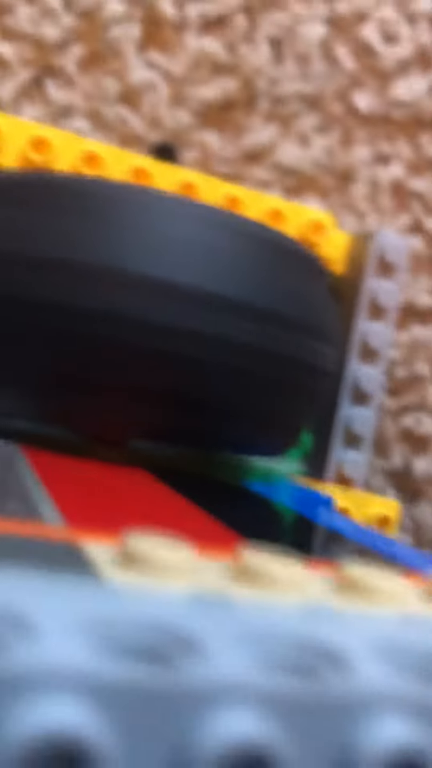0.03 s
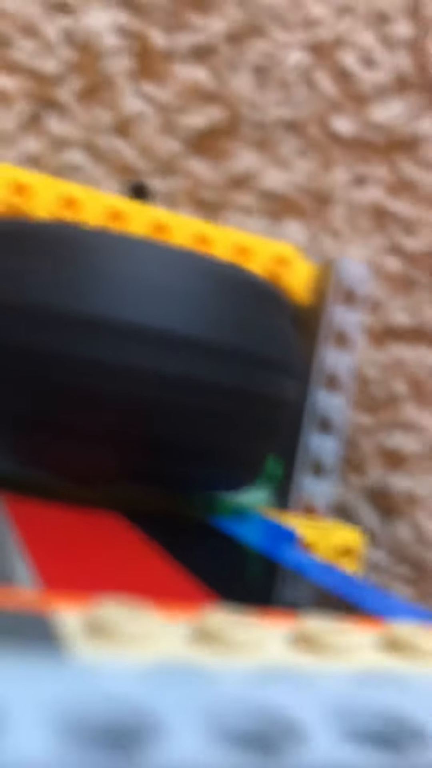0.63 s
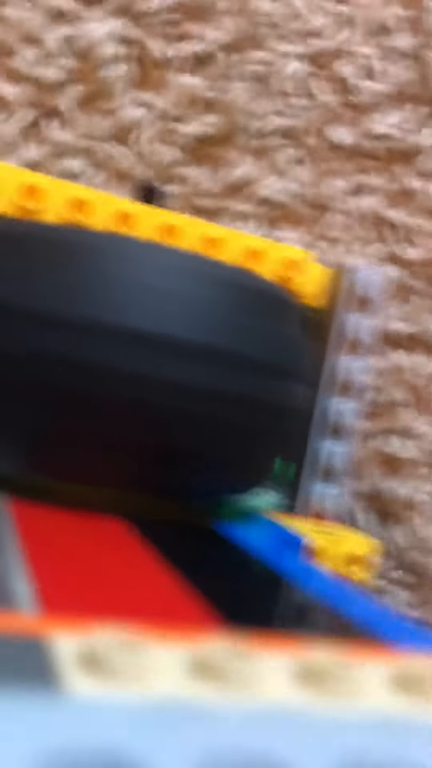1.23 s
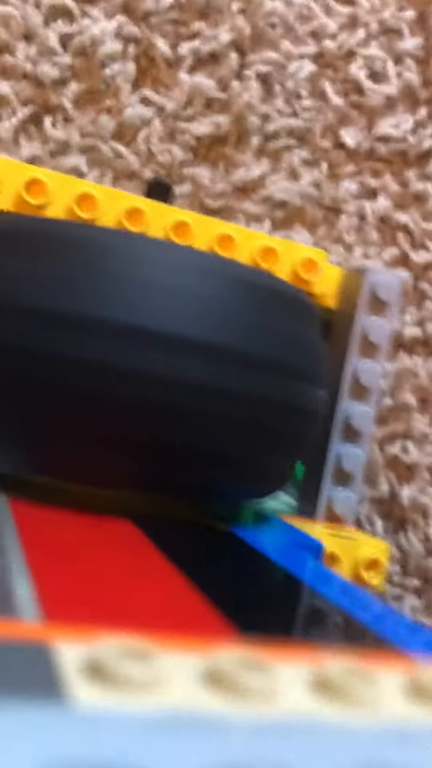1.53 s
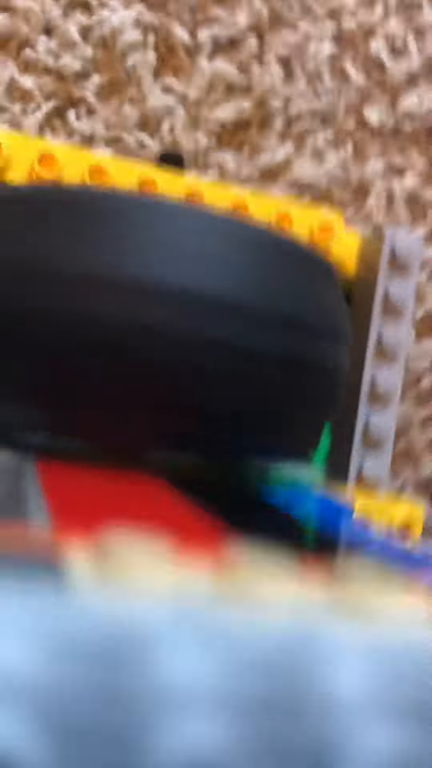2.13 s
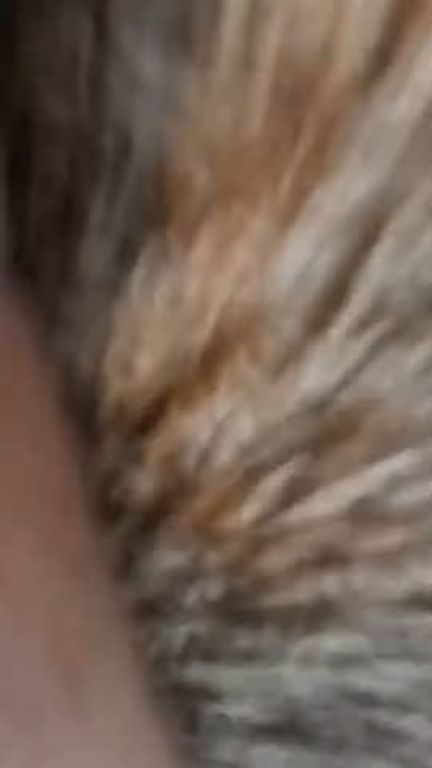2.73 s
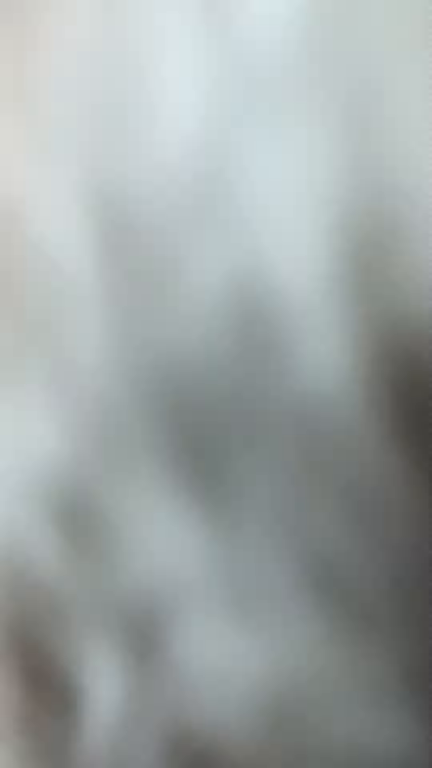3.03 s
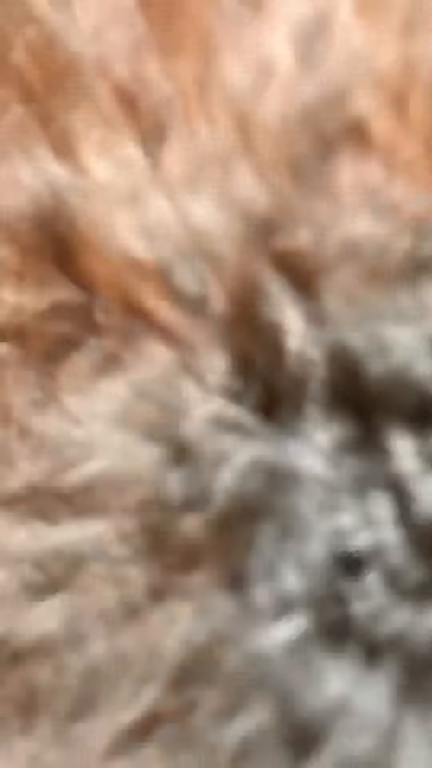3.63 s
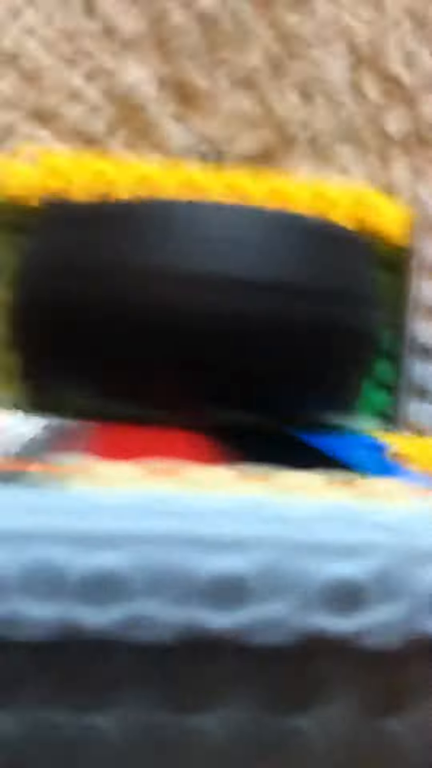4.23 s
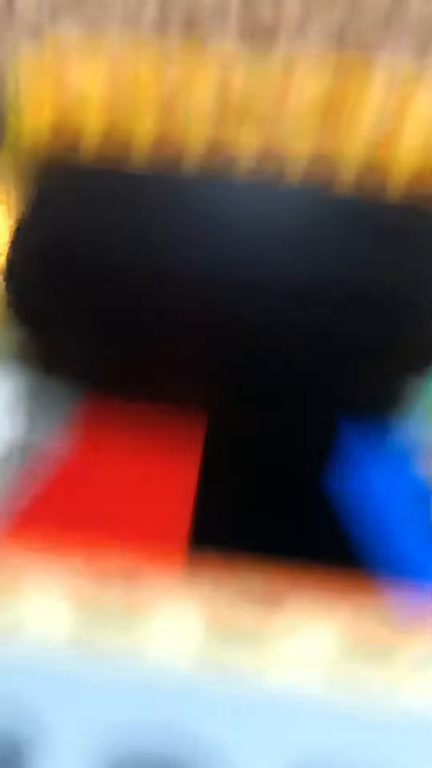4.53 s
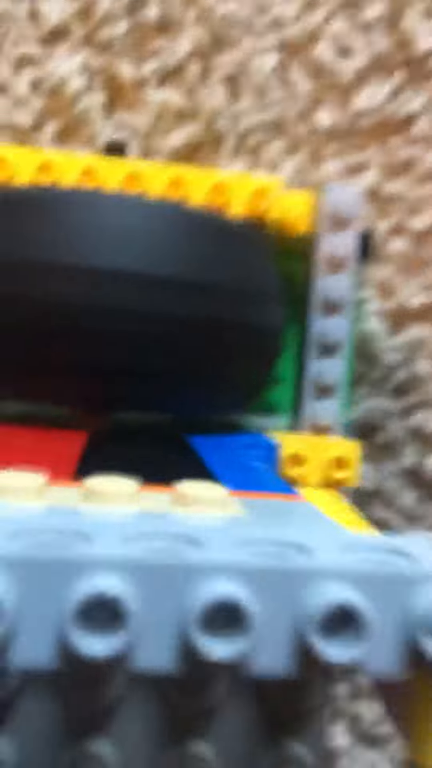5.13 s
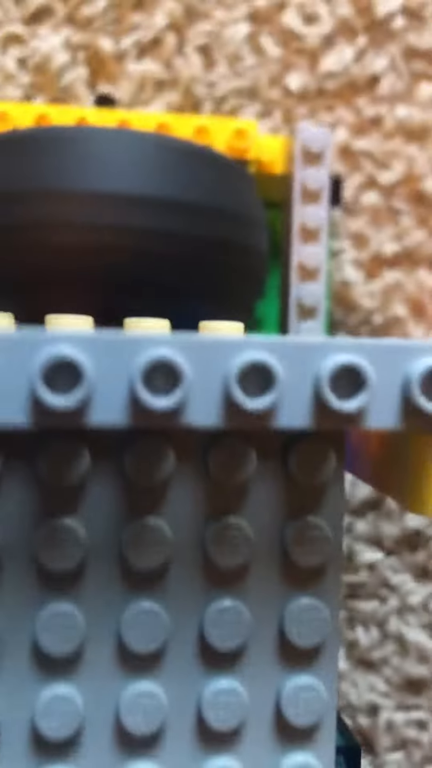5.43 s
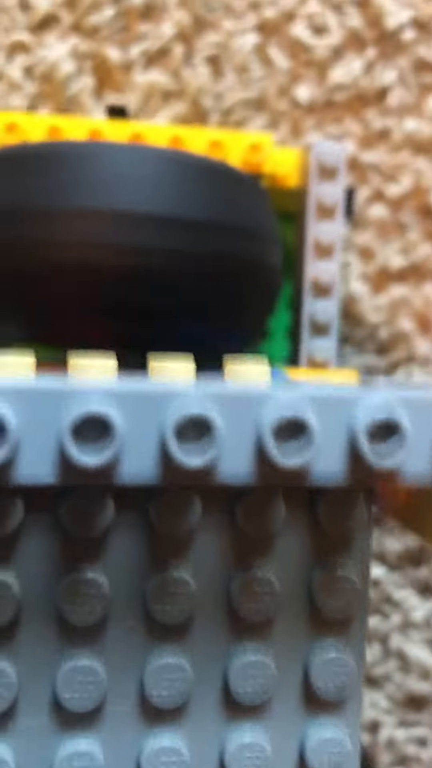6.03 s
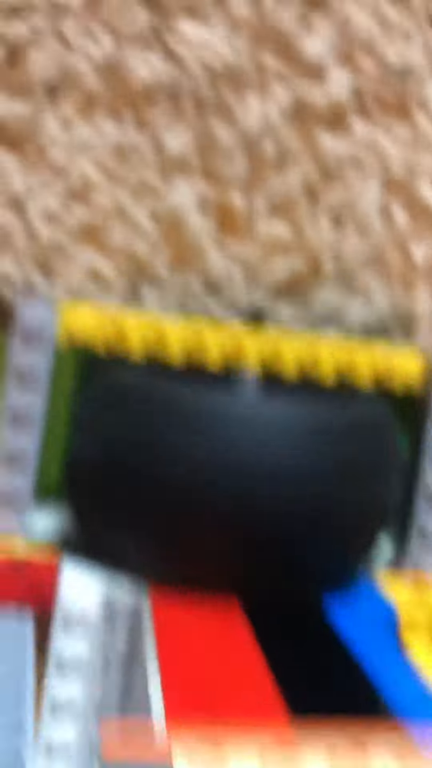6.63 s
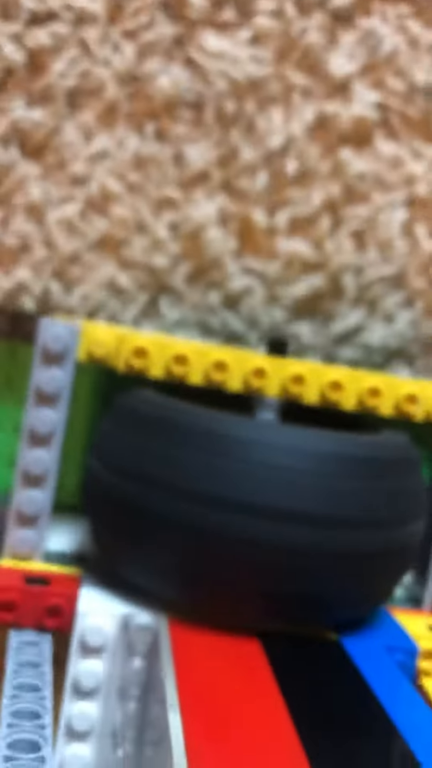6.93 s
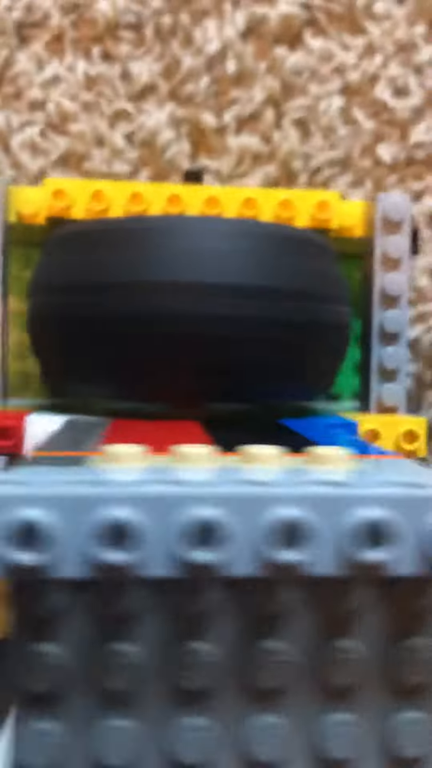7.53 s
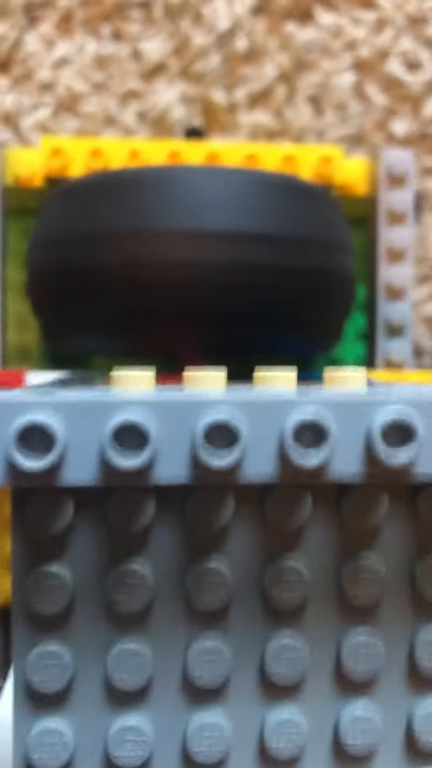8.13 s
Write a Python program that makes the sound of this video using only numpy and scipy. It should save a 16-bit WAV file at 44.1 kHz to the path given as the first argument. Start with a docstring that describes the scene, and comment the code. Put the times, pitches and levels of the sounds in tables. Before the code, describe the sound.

A small toy-brick piston engine runs on vacuum cleaner suction, making a rapid plastic rattle with pulsing hiss. It starts revved up, then drops to a fast idle. Around three seconds in, the close microphone brushes and bumps the carpet. The engine revs again a little past halfway, settles, and starts a third rev at the end. The vacuum cleaner hums faintly behind it indoors.

```python
"""A toy-brick piston engine on a carpet, run on vacuum cleaner suction and revved three times.
Twice a turn air rushes through its valve and the piston rattles and knocks in the plastic frame.
The microphone is close and wanders round the toy, now aimed at it, now turned away. About three
seconds in it brushes and bumps the carpet. The vacuum cleaner hums faintly in the background."""
import sys
import numpy as np
from scipy import signal
from scipy.io import wavfile
from scipy.ndimage import uniform_filter1d, minimum_filter1d

SR = 44100
rng = np.random.default_rng(int(sys.argv[2]) if len(sys.argv) > 2 else 0)


def unload_wav(signal):
    """Save mono or channel-first audio to the path in sys.argv[1] as 16-bit WAV at rate SR, clipped to [-1, 1]."""
    wavfile.write(
        sys.argv[1],
        SR,
        np.round(np.clip(np.atleast_2d(signal).T, -1, 1) * 32767).astype(np.int16),
    )


N = 365588

# The revs. Each row: throttle opens and shuts in seconds, speed to gain in turns per second.
REVS = [(-.445, 1.205, 16.057), (4.873, 5.651, 13.417), (7.883, 9, 14.447)]
# The flywheel at idle. Each row: time in seconds, speed in turns per second.
IDLE_SPEED = [(0, 25.123), (2.3, 26.173), (3.4, 24.613), (4.3, 23.645), (6.6, 24.711), (7.2, 25.593),
              (7.7, 24.533)]
# The two strokes of a turn. Each row: place in turns, spread in turns, relative level in dB.
STROKES = [(0.317, 0.052, -3.5), (0.689, 0.034, -5)]
# The piston's end blows. Each row: place in turns, relative dB with throttle shut, then fully open.
PISTON_BLOWS = [(0.222, 3, 1), (.63, 1.5, -9)]
# The frame shaking. Each row: multiple of the speed, relative dB at light load, then at full load.
THRUM_PARTIALS = [(1, -74, -56), (2, -58, -42), (3, -43, -43), (4, -57, -43), (5, -44, -37), (6, -54, -37),
                  (7, -52, -39), (8, -49, -45), (9, -56, -47), (10, -49, -50), (11, -51, -53)]
# Rings of the frame and the small bricks. Each row: pitch in Hz, bandwidth in Hz, relative level in dB.
FRAME_MODES = [(568, 110, -5), (628, 45, 2.5), (668, 24, 6), (912, 32, 3), (1020, 47, 2), (1430, 800, -7),
               (1960, 210, -8.5)]
BRICK_MODES = [(3630, 560, -14), (4630, 270, 2.5), (4960, 340, 14), (7100, 380, -7)]
# The vacuum cleaner's motor tones. Each row: pitch in Hz, relative level in dB.
MOTOR_TONES = [(185, -48.5), (740, -49)]
# The tone colour of each noise. Each row: frequency in Hz, relative level in dB.
VALVE_SPECTRUM = [(2000, -35), (4500, -19), (6400, -13), (7100, -8.5), (7600, -2.5), (7900, -2),
                  (8300, -4.5), (8900, -12.5), (10500, -22), (16000, -27)]
FIZZ_SPECTRUM = [(5000, -24), (8500, 2.5), (9900, 11.5), (10800, 4.5), (12000, -1), (14000, -3),
                 (16000, -18)]
RATTLE_SPECTRUM = [(900, -36), (2500, -12.5), (3300, -2.5), (3800, -2), (4500, 0.5), (5500, 1), (6600, -8),
                   (7800, -3), (9000, -0.5), (11000, -47), (16000, -29.5)]
SCRAPE_SPECTRUM = [(30, -44), (100, -21), (200, -1.5), (300, -6), (420, -4.5), (560, -3), (740, 2.5),
                   (880, 1), (1030, 2), (1350, -1.5), (1850, 3.5), (2500, -4), (4000, -5), (9000, -67)]
AIRFLOW_SPECTRUM = [(30, -30), (80, -22), (120, -15.5), (160, -6.5), (195, -6), (235, -7), (300, -14),
                    (450, -25), (2000, -28)]
PILE_SPECTRUM = [(30, -49), (90, -9), (170, 4), (300, -5.5), (550, 1.5), (1200, -3), (1700, 4),
                 (2100, -13.5), (3500, -38), (12000, -55)]
# Microphone aim. Each row: time in seconds, 0 for on the engine to 1 for turned away.
MIC_AIM = [(0, .25), (2.28, 0.34), (2.48, 1), (3.9, 0.97), (4.2, 0), (5.6, 0.03), (6.3, 0.26), (7.05, 0.89),
           (7.35, 0.26), (7.9, 0.07)]
# Nearness, bass and treble fizz on the way round the toy. Each row: time in seconds, gain in dB.
MIC_NEARNESS = [(0.0, -21), (0.04, -21.5), (1.25, -23), (1.29, -24.5), (2.22, -24), (2.88, -34),
                (3.14, -27), (3.44, -28), (3.58, -31), (3.62, -27), (4.27, -19), (4.39, -21.5),
                (4.85, -18.5), (5.03, -22), (6.3, -20.5), (6.72, -25), (7.13, -21.5), (8.29, -22)]
MIC_BASS = [(0, -12), (1.9, -4), (2.3, 0.5), (5.1, -1), (5.6, 5), (8.29, 7.5)]
MIC_TREBLE = [(0, 2), (1.9, -2), (2.5, 3), (3.5, 2), (3.78, 7.5), (4.45, -0.5), (6, 1), (7.1, -3),
              (8.29, 2)]
# The microphone crosses the valve's narrow beam of hiss, sweeps through the pile, is pressed into it.
# Each row: centre in seconds, half length in seconds, gain at the centre in dB.
BEAM_PASSES = [(2.17, 0.1, 3), (3.3, 0.67, 1), (4.48, 0.19, 6), (7.1, 0.24, 0)]
PILE_SWEEPS = [(3.05, 0.21, -19.5), (3.42, 0.13, -20.5), (3.76, .3, -27)]
PILE_PRESSES = [(2.79, 0.042, -4), (3.0, .05, 0.5), (3.55, 0.039, -1.5)]
# Bumps on the microphone. Each row: start in seconds, level in dB, first pitch in Hz, decay in seconds.
MIC_BUMPS = [(2.783, -11, 1090, 0.0037), (2.802, -7.5, 135, .008), (2.848, -10, 700, 0.0065),
             (2.953, -6, 1026, 0.014), (2.970, -7, 470, .019), (2.985, 4, 220, 0.01),
             (2.999, -3, 725, 0.031), (3.013, 9, 1134, 0.0094), (3.092, -0.5, 1285, 0.0067),
             (3.329, -26, 130, .014), (3.369, -17, 170, .009), (3.424, -23, 900, 0.0028),
             (3.628, -25, 120, .016)]


def amp(db):
    """Decibels to gain."""
    return 10 ** (np.asarray(db) / 20)


def unit(x):
    """Scales to an rms of one."""
    return x / np.sqrt(np.mean(x ** 2) + 1e-20)


def curve(rows):
    """Rows of time and value, joined by straight lines at every sample."""
    return np.interp(np.arange(N) / SR, *np.transpose(rows))


def swells(rows):
    """Bell-shaped swells, each paired with its gain in dB."""
    t = np.arange(N) / SR
    return [(np.exp(-((t - centre_s) / half_s) ** 2), db) for centre_s, half_s, db in rows]


def swell_gain(rows):
    """A gain that rests at one and swells or dips at each row."""
    return amp(sum(shape * db for shape, db in swells(rows)))


def wander(hz):
    """Random drift of unit rms, up to about the given rate."""
    steps = np.arange(N) * 2 * hz / SR
    return unit(np.interp(steps, np.arange(8000), rng.standard_normal(8000)))


def colour(x, spectrum):
    """Minimum-phase filter with the given spectrum; the result has unit rms."""
    hz, db = np.transpose(spectrum)
    log_gain = np.interp(np.log(np.fft.rfftfreq(4096, 1 / SR) + 1), np.log(hz), np.log(amp(db)))
    mirrored = np.r_[log_gain, log_gain[-2:0:-1]]
    taps = np.fft.ifft(np.exp(np.conj(signal.hilbert(mirrored)))).real
    return unit(signal.oaconvolve(x, taps)[:N])


def grains(per_s, spread_db):
    """Random clicks of uneven size."""
    size = amp(spread_db * np.minimum(rng.exponential(1, N), 4))
    return unit(size * rng.choice([-1, 1], N) * (rng.random(N) < per_s / SR))


def rev_shape(open_s, shut_s, rise_s, fall_s):
    """An S-shaped rise, a hold and an exponential fall."""
    t = np.arange(N) / SR
    rise = .5 * (1 + np.tanh(.5 * (t - open_s) / rise_s))
    return rise * np.exp(-np.maximum(t - shut_s, 0) / fall_s)


def revving():
    """One while the throttle is held open, zero at idle."""
    return sum(rev_shape(opens, shuts, rise_s=.065, fall_s=.05) for opens, shuts, _ in REVS)


def speed_gained(lag_s=.22, run_up_s=.117, coast_s=.334):
    """Turns per second above idle: the flywheel runs up behind the throttle, then coasts down."""
    return sum(gain * rev_shape(opens + lag_s, shuts, run_up_s, coast_s) for opens, shuts, gain in REVS)


def flywheel(start_turns=.973):
    """Angle of the flywheel in turns."""
    return start_turns + np.cumsum(curve(IDLE_SPEED) + speed_gained()) / SR


def turned_away():
    """How far the microphone points off the engine, 0-1."""
    return np.clip(curve(MIC_AIM), 0, 1)


def at_mic(db, rev_db, away_db):
    """Gain of an engine sound at the microphone: it follows distance, revs and aim."""
    return amp(curve(MIC_NEARNESS) + db + rev_db * revving() + away_db * turned_away())


def piston_strokes(turns, throttle, uneven_db=1.64):
    """Loose bricks make each stroke early or late, strong or weak; suction steadies the timing."""
    turn, strokes = turns.astype(int), []
    slop_turns = np.interp(throttle, [0, 1], [.034, .004])
    for place, spread, db in STROKES:
        late, strong = rng.standard_normal((2, turn[-1] + 1))[:, turn]
        offset = turns % 1 - place - slop_turns * late
        strokes.append((offset, spread, amp(db + uneven_db * strong)))
    return strokes


def stroke_gate(strokes, throttle, width, lag_turns, shut_gap_db, open_gap_db):
    """Swells at each stroke and shuts more quickly; the throttle sets the floor in the gaps."""
    power = amp(shut_gap_db + (open_gap_db - shut_gap_db) * throttle) ** 2
    for offset, spread, gain in strokes:
        skew = 1 - .4 * np.sign(offset - lag_turns)
        power += gain ** 2 * np.exp(-.5 * ((offset - lag_turns) / (spread * width * skew)) ** 2)
    return np.sqrt(power / uniform_filter1d(power, size=5000))


def valve_air(strokes, throttle, flutter_db=2):
    """Air hisses through the valve slot, which rings near 8 kHz and beams its sound."""
    gate = stroke_gate(strokes, throttle, width=1.32, lag_turns=.0085, shut_gap_db=-3.5, open_gap_db=-19)
    jet = rng.standard_normal(N) * gate * amp(flutter_db * wander(380))
    hiss = colour(jet, VALVE_SPECTRUM)
    return hiss * at_mic(db=4.9, rev_db=1.8, away_db=2.5) * swell_gain(BEAM_PASSES)


def edge_fizz(strokes, throttle):
    """Air sizzles over the brick edges as the valve closes, most of all in a rev."""
    gate = stroke_gate(strokes, throttle, width=.5, lag_turns=.021, shut_gap_db=9.5, open_gap_db=-28)
    sizzle = colour(rng.standard_normal(N) * gate, FIZZ_SPECTRUM)
    return sizzle * at_mic(db=-7.5, rev_db=5.5, away_db=.6) * amp(curve(MIC_TREBLE))


def brick_rattle(strokes, throttle):
    """Each stroke shakes a cluster of tiny plastic clicks out of the bricks."""
    gate = stroke_gate(strokes, throttle, width=.92, lag_turns=.037, shut_gap_db=-3, open_gap_db=-17.5)
    clicks = grains(per_s=9000, spread_db=3.5) * gate
    return colour(clicks, RATTLE_SPECTRUM) * at_mic(db=.6, rev_db=0, away_db=-2)


def brick_clacks(strokes, throttle, lag_turns=.012, uneven_db=2, pitch_scatter=.018):
    """At the height of a stroke one loose brick is struck; each rings a little differently."""
    t, out = np.arange(256) / SR, np.zeros(N)
    for offset, _, gain in strokes:
        hits = np.flatnonzero((offset[:-1] < lag_turns) & (offset[1:] >= lag_turns))
        uneven = amp(uneven_db * rng.standard_normal(N // 100)[:len(hits)])
        size = gain[hits] * (.5 + throttle[hits]) * uneven
        detune = 1 + pitch_scatter * rng.standard_normal((N // 100, 1))[:len(hits)]
        ring = sum(amp(db) * np.sin(2 * np.pi * hz * detune * t) * np.exp(-np.pi * width * t)
                   for hz, width, db in BRICK_MODES)
        samples = np.minimum(hits[:, None] + np.arange(len(t)), N - 1)
        np.add.at(out, samples, size[:, None] * ring)
    return unit(out) * at_mic(db=-8.5, rev_db=.5, away_db=-3)


def reflections(direct, echo_db=-17):
    """Echoes off the toy's walls and things close by; their delays drift as the microphone moves."""
    t, out = np.arange(N) / SR, direct
    for delay_s in (.0009, .0014, .0021, .0031):
        out = out + amp(echo_db) * np.interp(t - delay_s * (1 + .03 * wander(1)), t, direct)
    return out


def piston_knocks(turns, throttle, base_db=-31, db_per_speed=.1357, away_db=-12):
    """The piston hits its two ends every turn, harder with speed, and rings the hollow frame."""
    blows = np.zeros(N)
    for place, shut_db, open_db in PISTON_BLOWS:
        hits = np.flatnonzero(np.diff(np.floor(turns - place)))
        uneven = 1 + .12 * rng.standard_normal(N)[hits]
        blows[hits] += amp(shut_db + (open_db - shut_db) * throttle[hits] ** 2) * uneven
    ring = sum(amp(db) * signal.lfilter(*signal.iirpeak(hz, hz / width, SR), blows)
               for hz, width, db in FRAME_MODES)
    low_cut = signal.butter(4, 450, "high", fs=SR, output="sos")  # small plates radiate little bass
    mic_db = away_db * turned_away() ** 2 - .16 * curve(MIC_BASS)
    return unit(signal.sosfilt(low_cut, ring)) * amp(base_db + db_per_speed * speed_gained() + mic_db)


def piston_scrape(strokes, throttle, base_db=-27, rev_db=-.5, away_db=-2):
    """The piston scrapes along the cylinder just ahead of each rush of air."""
    gate = stroke_gate(strokes, throttle, width=3, lag_turns=-.078, shut_gap_db=-3, open_gap_db=-2.5)
    friction = colour(grains(per_s=3000, spread_db=2) * gate, SCRAPE_SPECTRUM)
    mic_db = away_db * turned_away() - .19 * curve(MIC_BASS)
    return friction * amp(base_db + rev_db * revving() + mic_db)


def frame_thrum(turns, throttle, base_db=-3, db_per_speed=.2545):
    """The piston's mass and the suction pulses shake the frame, harder the faster it runs."""
    load, out = np.clip(2 * throttle - .6, 0, 1), np.zeros(N)
    since_blow = turns - PISTON_BLOWS[0][0]  # the partials roughly line up at the hardest blow
    for multiple, light_db, full_db in THRUM_PARTIALS:
        angle = multiple * since_blow + .43 * rng.random()
        out += np.sqrt(2) * np.sin(2 * np.pi * angle) * amp(light_db + (full_db - light_db) * load)
    mic_db = .5 * curve(MIC_BASS) * (1 - revving())
    return out * amp(base_db + mic_db + db_per_speed * speed_gained() + .79 * wander(5.4))


def vacuum_cleaner(drift=.0038, waver=.86, airflow_db=-39):
    """In the background, a low rush of air and faint wavering motor tones."""
    clock = np.cumsum(1 + drift * wander(12)) / SR
    motor = sum(amp(db) * np.sqrt(2) * np.sin(2 * np.pi * hz * clock) * (1 + waver * wander(13))
                for hz, db in MOTOR_TONES)
    airflow = amp(airflow_db) * colour(rng.standard_normal(N), AIRFLOW_SPECTRUM)
    return (motor + airflow) * amp(curve(MIC_BASS))


def carpet_brush():
    """Carpet pile brushes right against the microphone."""
    fibres = colour(grains(per_s=2500, spread_db=5.5), PILE_SPECTRUM)
    return fibres * sum(shape * amp(db) for shape, db in swells(PILE_SWEEPS))


def carpet_bumps(port_hz=76, hard_hz=450, glide_s=.00408, rise_s=.00017, tick_s=.0018):
    """Each bump is a crunch and a thud that drops in pitch as the microphone's port is covered."""
    t, out = np.arange(SR // 6) / SR, np.zeros(N)
    for start_s, db, first_hz, decay_s in MIC_BUMPS:
        last_hz = port_hz * (first_hz / port_hz) ** .34  # keeps a third of its octaves above the port
        hz = last_hz + (first_hz - last_hz) * np.exp(-t / glide_s)
        hz *= 1 + .27 * wander(496)[:len(t)]  # the pile catches and slips
        thud = np.sin(2 * np.pi * np.cumsum(hz) / SR) * np.exp(-t / decay_s) * (1 - np.exp(-t / rise_s))
        crunch = signal.lfilter(*signal.butter(2, 8500, fs=SR), rng.standard_normal(len(t)))
        hardness = min(first_hz / hard_hz, 1) ** 2  # low bumps hardly tick
        tick = hardness * crunch * (t / tick_s) * np.exp(-(t / tick_s) ** 2)
        out[round(start_s * SR):][:len(t)] += amp(db) * (thud + tick)
    return out


def scene(idle_throttle=.55):
    """The flywheel angle times every part of the engine; all meet at one moving microphone."""
    turns = flywheel()
    opening = np.clip(idle_throttle + (1 - idle_throttle) * revving(), 0, 1)
    throttle = opening * (1 - turned_away())  # as heard: its bite is lost off axis
    strokes = piston_strokes(turns, throttle)
    air = valve_air(strokes, throttle) + edge_fizz(strokes, throttle)
    bricks = brick_rattle(strokes, throttle) + brick_clacks(strokes, throttle)
    frame = piston_knocks(turns, throttle) + piston_scrape(strokes, throttle)
    clatter = (reflections(air + bricks) + frame) * swell_gain(PILE_PRESSES)
    engine = clatter + frame_thrum(turns, throttle)
    return (engine + carpet_brush() + carpet_bumps() + vacuum_cleaner())[None]


def record(dry, ceiling=.92, recover_db_per_s=250, top_hz=15900):
    """The recorder's fast limiter ducks at the loudest peaks and soon recovers; a low-pass follows."""
    over_db = 20 * np.log10(np.maximum(abs(dry) / ceiling, 1))
    recovery_db = np.arange(N) / SR * recover_db_per_s
    gain = amp(recovery_db - np.maximum.accumulate(over_db + recovery_db, axis=1))
    smooth_gain = uniform_filter1d(minimum_filter1d(gain, size=41), size=41)
    low_pass = signal.firwin(511, top_hz, window=("kaiser", 9), fs=SR)
    return signal.oaconvolve(dry * smooth_gain, low_pass[None], "same")


dry = scene()
out = record(dry)
unload_wav(out)
```